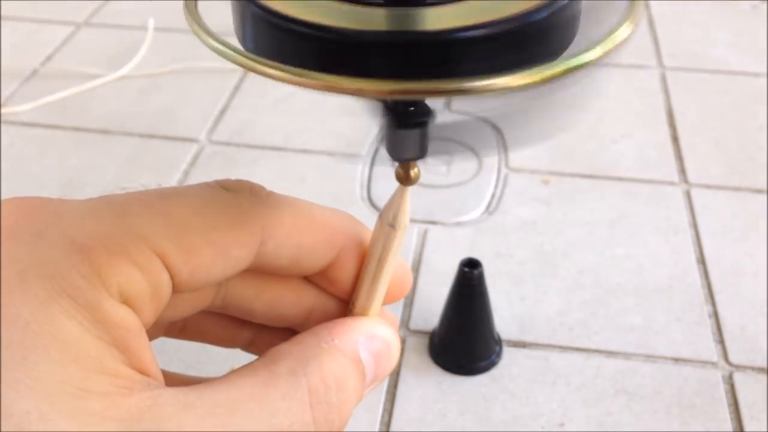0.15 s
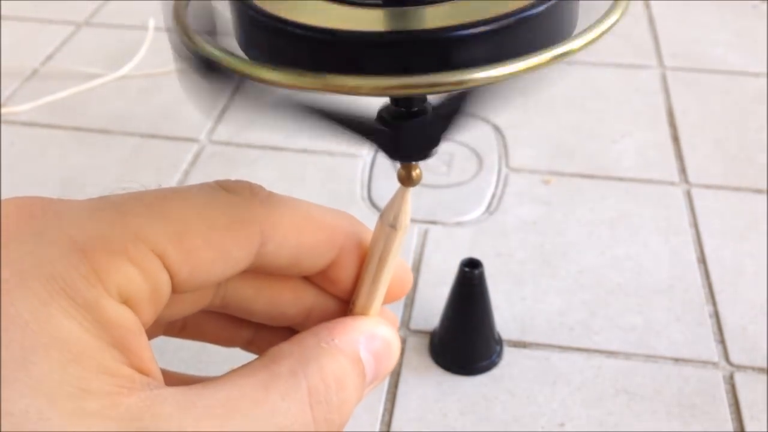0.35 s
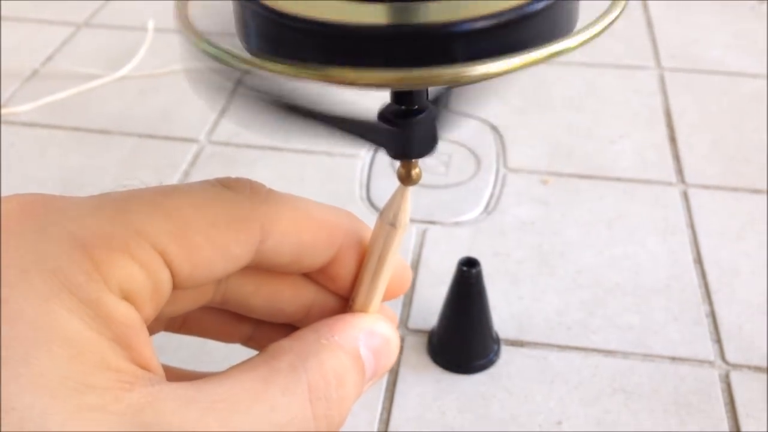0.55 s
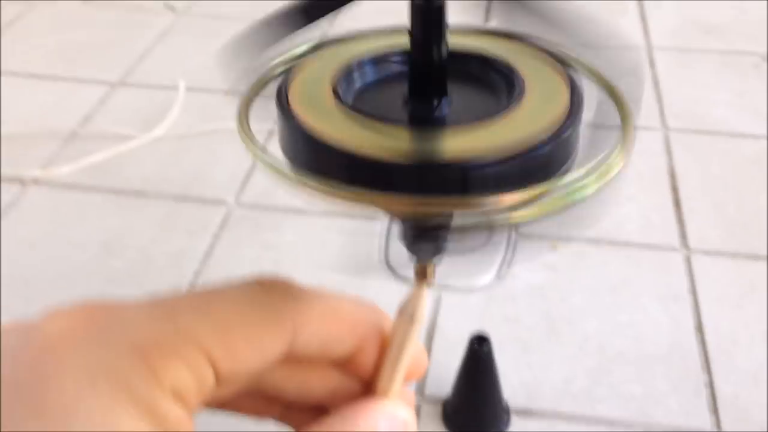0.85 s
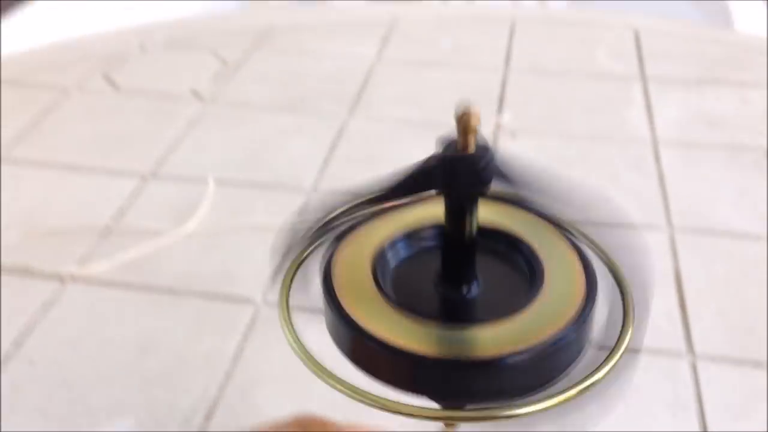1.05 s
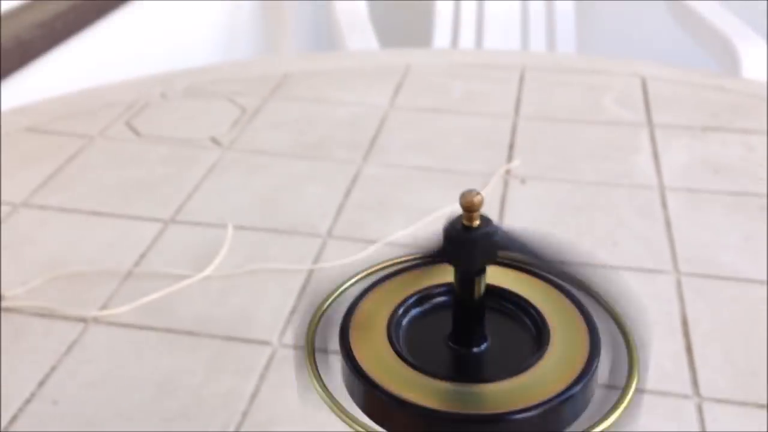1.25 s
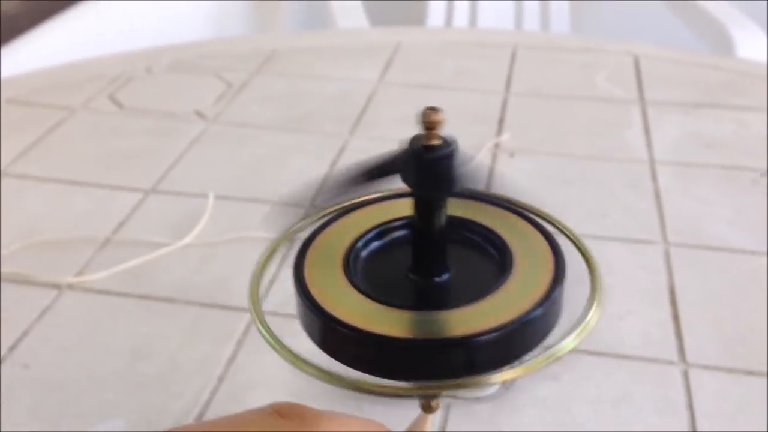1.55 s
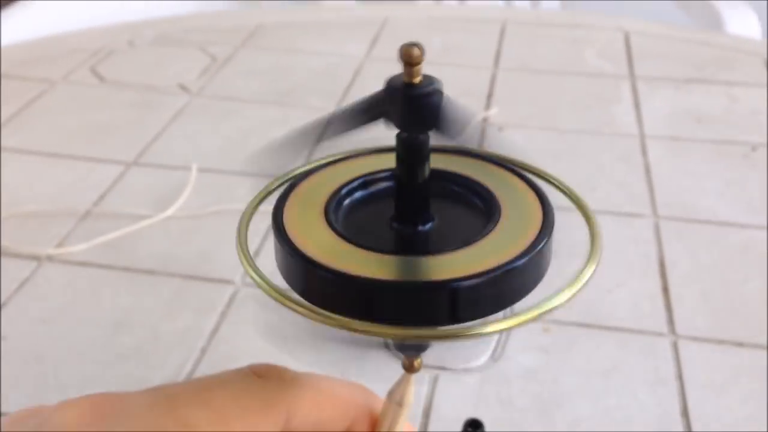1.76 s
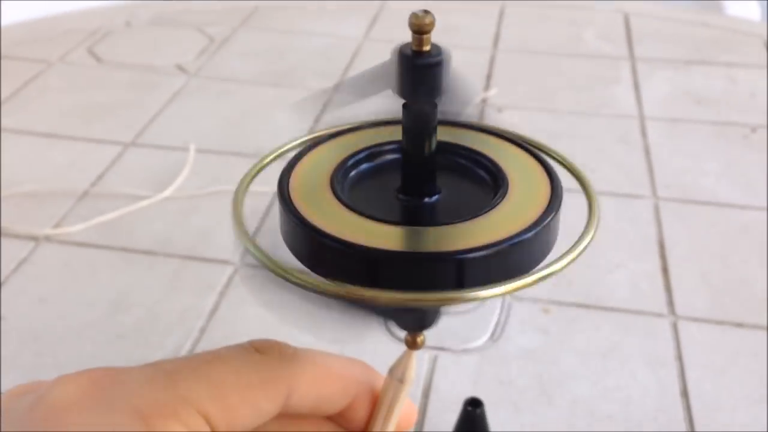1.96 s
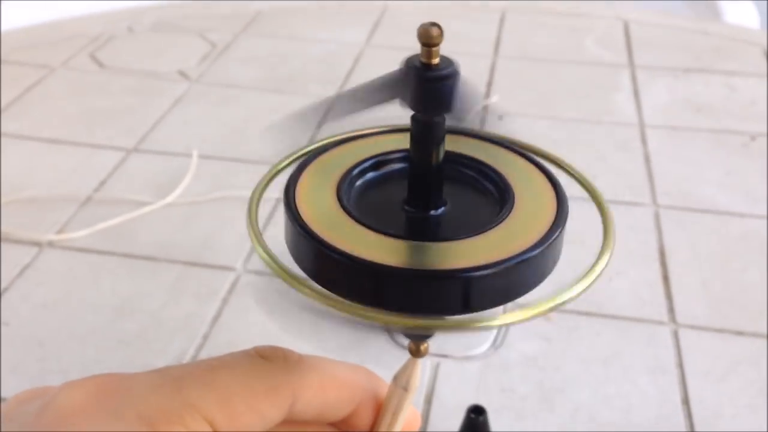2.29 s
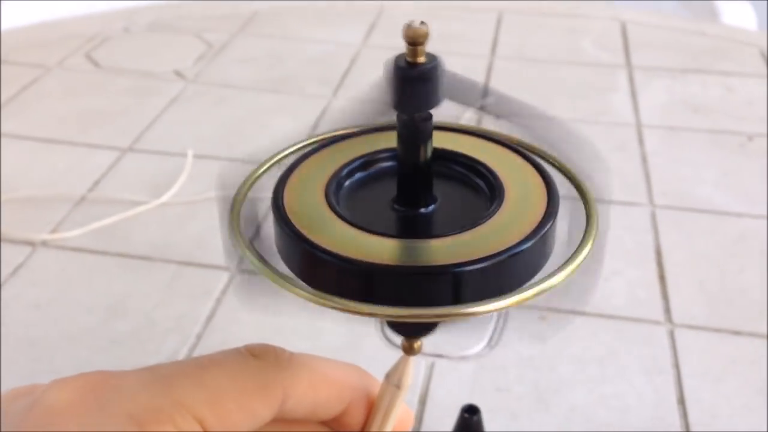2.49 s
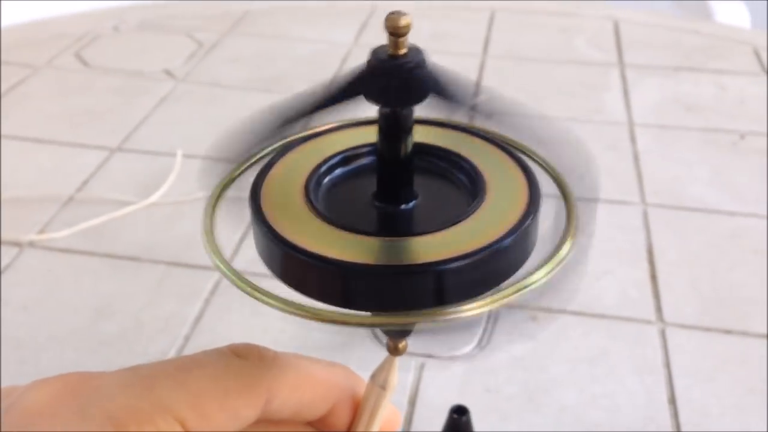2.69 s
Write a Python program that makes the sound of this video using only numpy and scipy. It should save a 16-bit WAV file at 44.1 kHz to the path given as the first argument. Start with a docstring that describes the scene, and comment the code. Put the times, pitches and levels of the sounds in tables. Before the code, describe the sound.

A toy gyroscope spins on a hand-held stick, its loose axle making a fast, whirring plastic rattle, close by indoors. The ticks come in quick, uneven flurries, loudest and brightest for the first 0.8 seconds, then a little softer and steadier until the end near 2.8 seconds. A faint low hum and buzz fade underneath, and one soft, dull knock comes at about 2.1 seconds over quiet room noise.

```python
"""A plastic rattle in quick flurries: a toy gyroscope spinning on the tip of a hand-held stick, indoors.
Its axle chatters in loose bearings about once a turn, flurrying as the frame swings round; every tick
rings the plastic body. The slowing wheel hums, stick and hand buzz, something knocks once.
Underneath: a low drone, a faint brief whine, rumble and the room's murmur."""
import sys
import numpy as np
from scipy import signal
from scipy.fft import rfft, irfft, next_fast_len
from scipy.io import wavfile
from scipy.ndimage import uniform_filter1d, map_coordinates

SR = 44100
rng = np.random.default_rng(int(sys.argv[2]) if len(sys.argv) > 2 else 0)


def store_wav(level_fs):
    """Save 16-bit WAV to argv[1]."""
    pcm = np.round(np.clip(np.atleast_2d(level_fs), -1, 1) * 32767)
    wavfile.write(sys.argv[1], SR, pcm.T.astype(np.int16))


N = 124803

# Swells of axle chatter: centre_s, level_db, width_s
FLURRIES = [(0.009, -40, 0.021), (0.099, -41, 0.015), (0.132, -41, 0.017), (0.176, -38.5, 0.024),
            (0.228, -40.5, 0.055), (0.293, -37.5, 0.016), (0.344, -40, 0.042), (0.403, -35.5, 0.016),
            (0.46, -40.5, 0.036), (0.518, -43, 0.017), (0.568, -42.5, 0.033), (0.634, -44.5, 0.028),
            (0.663, -54, 0.0065), (0.693, -43.5, 0.02), (0.765, -41, 0.02), (0.825, -48, 0.056),
            (0.904, -42, 0.012), (0.97, -40.5, 0.016), (1.045, -42.5, 0.036), (1.117, -46.5, 0.033),
            (1.191, -47, 0.04), (1.237, -55, 0.0068), (1.258, -44, 0.038), (1.3, -47, 0.014),
            (1.351, -46, 0.037), (1.434, -42.5, 0.019), (1.506, -43.5, 0.013), (1.58, -47.5, 0.012),
            (1.6, -49.5, 0.035), (1.68, -46, 0.03), (1.781, -45.5, 0.041), (1.809, -58, 0.0061),
            (1.86, -47, 0.045), (1.952, -48, 0.062), (1.99, -49.5, 0.014), (2.039, -44.5, 0.027),
            (2.065, -46.5, 0.016), (2.15, -44.5, 0.036), (2.243, -46, 0.045), (2.319, -44.5, 0.022),
            (2.346, -44.5, 0.012), (2.427, -49.5, 0.044), (2.459, -50, 0.014), (2.527, -47, 0.036),
            (2.644, -48, 0.047), (2.704, -63, 0.014), (2.747, -50.5, 0.068), (2.823, -43, 0.0082)]
# Chatter between flurries: time_s, level_db
CHATTER_FLOOR = [(0.0, -38), (0.24, -55), (0.54, -52), (0.94, -49.5), (1.43, -51), (1.81, -54), (2.13, -53),
                 (2.48, -53), (2.83, -52)]
# Loudest axle ticks: time_s, relative_level_db, relative_brightness_db
LOUD_TICKS = [(0.0022, -34.5, 14), (0.0075, -23, -10), (0.015, -39, 18), (0.0174, -39, 11),
              (0.0272, -37, 6), (0.038, -28, 7), (0.0495, -28, -2), (0.1637, -46, -24), (0.1697, -25, -23),
              (0.172, -35, 2), (0.1757, -25.5, -20), (0.179, -27.5, 5), (0.1856, -23, -4), (0.2, -27.5, 5),
              (0.2106, -25, -18), (0.216, -33, 2), (0.222, -35, 3), (0.23, -23.5, 1.5),
              (0.2825, -25.5, -12), (0.2916, -34, -12), (0.2992, -27, -2), (0.3295, -25, -15),
              (0.335, -32, 0), (0.3398, -29, -1), (0.3487, -27, 1), (0.3535, -20, -17),
              (0.3979, -22.5, -10), (0.4034, -35, -1), (0.407, -30, -7), (0.4109, -25, 2),
              (0.448, -42, -27), (0.4497, -34.5, 10), (0.456, -20.5, -4), (0.4625, -28, 9),
              (0.5044, -32, -18), (0.5178, -25, 1.5), (0.565, -30, -15), (0.5669, -24, -19),
              (0.5728, -40, -8), (0.5794, -34, 4), (0.5986, -31, -3), (0.6714, -30.5, -13), (0.689, -35, 2),
              (0.6996, -37, 10), (0.7142, -25.5, -6), (0.7193, -24, -23), (0.755, -31, -25),
              (0.7623, -28, 8), (0.769, -39, 13), (0.7732, -35, -1), (0.8995, -48, -26), (0.9072, -36, -4),
              (0.967, -38, -10), (0.9711, -46, -17), (0.9738, -32, -16), (0.9905, -26.5, -19),
              (1.0296, -28.5, -44), (1.0375, -30.5, -6), (1.0475, -34, -10), (1.0612, -41, -20),
              (1.115, -65, -33), (1.1853, -36, -39), (1.2113, -36, -41), (1.2273, -30.5, -34),
              (1.257, -46, -20), (1.2628, -24, -16), (1.2935, -30, -28), (1.332, -36, -26),
              (1.3495, -28.5, -12), (1.3619, -33, 1), (1.373, -46, -15), (1.413, -33, -33),
              (1.438, -30, -11), (1.454, -32.5, -18), (1.4635, -28, -16), (1.4702, -35, -13),
              (1.495, -28, -15), (1.5048, -31, -11), (1.5154, -26.5, -13), (1.518, -30, -28),
              (1.5297, -28, -27), (1.5368, -30, -30), (1.5768, -28.5, -34), (1.618, -27, -16),
              (1.625, -28, -21), (1.6696, -34, -13), (1.6796, -32.5, -38), (1.696, -30, -27),
              (1.7042, -30, -22), (1.746, -33, -22), (1.7608, -29, -9), (1.7624, -44, -19),
              (1.7876, -29.5, -22), (1.8105, -37, -26), (1.8455, -29, -28), (1.8545, -29, -10),
              (1.861, -29, -14), (1.8663, -29.5, -12), (1.874, -35, -25), (1.9527, -31.5, -14),
              (2.0366, -28.5, -14), (2.0655, -31, -9), (2.1223, -28, -24), (2.1255, -28, -18),
              (2.1318, -28, -10), (2.1355, -38, 12), (2.1385, -33.5, 5), (2.1435, -47, -6),
              (2.1474, -38.5, 5), (2.1593, -38, -12), (2.1656, -37, -13), (2.2238, -34.5, -1),
              (2.2333, -34, 7), (2.2571, -29, -4), (2.3048, -28.5, -27), (2.3119, -28, -17),
              (2.321, -35, -22), (2.326, -42, -6), (2.3558, -29.5, -10), (2.41, -33, -12),
              (2.4144, -26.5, -21), (2.4217, -34, 2), (2.429, -34, -17), (2.4593, -29.5, -36),
              (2.5152, -33, -13), (2.521, -44, -12), (2.527, -39.5, -6), (2.5379, -34.5, -2),
              (2.5439, -30.5, -34), (2.5513, -31.5, -33), (2.617, -33.5, -6), (2.6306, -35, -6),
              (2.6342, -33, -17), (2.6418, -31.5, -4), (2.6928, -28, -12), (2.7117, -32, -15),
              (2.7179, -32, -12), (2.7224, -33, -11), (2.7357, -33, -4), (2.758, -30, -10),
              (2.8098, -34, 2), (2.8173, -33, -12), (2.8222, -28, -26), (2.8257, -50, -30)]
# Listener's rise over the wheel: time_s, share_0_to_1
LISTENER_RISE = [(0, 0), (.5, 0.17), (.8, 0.16), (1.2, 0.86), (2.83, 1)]
# Plastic body modes: pitch_hz, width_hz, gain_from_below_db, gain_from_above_db
BODY_MODES = [(537, 93, -19, -23), (932, 180, -30.5, -30.5), (1190, 76, -23.5, -26), (1545, 82, -19, -24),
              (1836, 250, -24, -27.5), (2056, 195, -14, -17.5), (2372, 160, -11, -16), (2858, 440, -7, -20),
              (3810, 530, -11, -10), (4506, 440, -6, -25.5), (5047, 340, -7.5, -2), (5464, 290, 0, -1.5),
              (5784, 580, -4.5, -11.5), (6680, 2600, -16, -15.5), (7956, 580, -10.5, -17.5),
              (9270, 1350, -21, -25), (10700, 300, -24, -30), (11430, 500, -22, -20.5),
              (12980, 790, -36, -44), (15300, 1300, -62, -33), (13800, 2200, -28, -30.5)]
# Hum of the wheel's unbalance: time_s, level_db
HUM_LEVEL = [(0, -60.5), (.4, -65.5), (.8, -72), (1.1, -65), (1.4, -75), (1.75, -77), (2.83, -84)]
# Buzz of stick and hand: time_s, level_db
BUZZ_LEVEL = [(0, -63.5), (.35, -64), (.6, -66.5), (1, -74.5), (1.4, -98), (2.83, -77)]
# Modes of the knocked object: pitch_hz, relative_level_db, undamped_t60_s
KNOCK_MODES = [(220, -4.5, 0.045), (580, -26, 0.062), (965, -4, 0.073), (1121, -9.5, 0.07),
               (1294, -6.5, 0.078), (1475, -11.5, .07), (1940, -12, 0.07)]
# Low wavering tone: time_s, level_db
DRONE_LEVEL = [(0, -81), (.5, -70), (.9, -82.5), (1.5, -72), (1.9, -86), (2.1, -66.5), (2.4, -74.5),
               (2.6, -66.5), (2.83, -67)]
# Faint brief tone: time_s, level_db
WHINE_LEVEL = [(.4, -90), (.55, -69), (.7, -76.5), (.9, -83)]
# Low rumble: time_s, level_db
RUMBLE_LEVEL = [(0.0, -83), (0.04, -54.5), (0.07, -76), (0.73, -67), (0.8, -84), (1.5, -71.5), (1.57, -84),
                (2.08, -68.5), (2.17, -83), (2.42, -63), (2.45, -99), (2.58, -66), (2.7, -83), (2.83, -65)]
# Room noise spectrum: frequency_hz, relative_density_db
MURMUR_SPECTRUM = [(53, -50), (90, -14), (140, 3), (356, -7.5), (512, -13), (708, -11.5), (828, -12),
                   (1390, -20), (2000, -33), (2600, -4), (4400, -120)]

SPIN_HZ, SPIN_SAG_HZ_PER_S = 208.5, 29
CHATTER_HZ, CHATTER_SAG_HZ_PER_S, CYCLE_LOCK = 174.15, 20, 0.57
LOUD_TICK_GAIN, SMALL_TICK_GAIN, RUB_GAIN = 15.93, 28.39, 1.897
CONTACT_S, TRAVEL_S, SCRAPE_S, WHIRR_S = 0.00039, 0.0004, 0.002, 0.02
LOW_BELOW_HZ, HIGH_ABOVE_HZ, BAND_SPAN_HZ = 4100, 6000, 1600  # mode groups
LOW_TICK_DB, HIGH_TICK_DB, WHIRR_DB, SIZZLE_DB = -3.5, -3.5, 8, 2.5
SIZE_SCATTER_DB, MODE_SCATTER_DB, BRIGHT_SHARE = 2, 1.5, 0.6
KNOCK_START_S, KNOCK_GAIN_DB, KNOCK_RISE_S = 2.0602, -31.5, 0.007
KNOCK_FREE_S, KNOCK_DAMPING_T60_S, KNOCK_ROUGH_DB = 0.02, 0.035, 3.5
RATTLE_ROOM_DB, KNOCK_ROOM_DB, MURMUR_DB = -10.5, -8.5, -66.5
TIME_S = np.arange(N) / SR


def rattle():
    """Ticks and rub ring the plastic body, heard first from below, then from above."""
    hz, width_hz, below_db, above_db = np.transpose(BODY_MODES)[:, :, None]
    contact_s = CONTACT_S * np.minimum(1, HIGH_ABOVE_HZ / hz) ** 2

    def body_response(f):
        soft_contact = 0.012 + np.exp(-(np.pi * contact_s * (f - hz)) ** 2)
        return resonance(f, hz, width_hz) * soft_contact

    view_db = below_db + (above_db - below_db) * np.clip(curve(LISTENER_RISE), 0, 1)
    turning_db = np.array([wobble(25) for _ in BODY_MODES])  # modes waver as the frame turns
    low, high = hz < LOW_BELOW_HZ, hz > HIGH_ABOVE_HZ
    level = chatter_level()
    blows = mode_blows(hz[:, 0], *axle_ticks(level))
    drive = blows * amp(LOW_TICK_DB * low + HIGH_TICK_DB * high) + bearing_rub(level, low, high)
    return np.sum(amp(view_db + turning_db) * filtered(drive, body_response), axis=0)


def chatter_level():
    """How hard the axle chatters: a floor plus a swell at each flurry."""
    swell_power = sum(amp(2 * db) * np.exp(-4 * np.log(2) * ((TIME_S - centre_s) / width_s) ** 2)
                      for centre_s, db, width_s in FLURRIES)
    return np.sqrt(swell_power + amp(2 * curve(CHATTER_FLOOR)))


def axle_ticks(level, small_count=1900):
    """The axle hits its bearings: small ticks, strongest once a contact cycle, plus the loud ones."""
    cycle = turns(CHATTER_HZ, CHATTER_SAG_HZ_PER_S) + 0.17 * wobble(30)
    bunching = 1 + CYCLE_LOCK * np.cos(2 * np.pi * cycle)
    small_at = rng.integers(0, N, size=small_count)
    small = amp(SIZE_SCATTER_DB * rng.standard_normal(small_count)) * bunching[small_at] ** 2
    loud_s, loud_db, bright_db = np.transpose(LOUD_TICKS)
    sizes = np.r_[SMALL_TICK_GAIN * level[small_at] * unit(small), LOUD_TICK_GAIN * amp(loud_db)]
    treble_db = np.r_[np.zeros(small_count), BRIGHT_SHARE * (bright_db - bright_db.mean())]
    return np.r_[small_at, loud_s * SR], sizes, treble_db


def mode_blows(mode_hz, tick_at, sizes, treble_db):
    """Modes close in pitch are struck together, keeping each tick firm; high modes get a short scrape."""
    uneven, lag, polarity = rng.standard_normal((3, len(sizes), len(mode_hz)))
    band = (mode_hz // BAND_SPAN_HZ).astype(int)
    high = mode_hz > HIGH_ABOVE_HZ
    signs = np.sign(polarity[:, band]) * (-1) ** np.arange(len(mode_hz))
    gains = signs * sizes[:, None] * amp(MODE_SCATTER_DB * uneven + treble_db[:, None] * high)
    arrivals = np.clip(tick_at[:, None] + TRAVEL_S * SR * (lag[:, band] - 1), 0, N - 1).astype(int)
    blows = np.array([np.bincount(at, gain, N) for at, gain in zip(arrivals.T, gains.T)])
    scrape_power = np.abs(uniform_filter1d(blows[high] ** 2, round(SCRAPE_S * SR), axis=1))
    blows[high] = np.sqrt(scrape_power) * rng.standard_normal(scrape_power.shape)
    return blows


def bearing_rub(level, low, high):
    """Rubbing noise: an even whirr in the low modes, a sizzle in the high ones."""
    whirr = amp(WHIRR_DB) * uniform_filter1d(level, round(WHIRR_S * SR))
    envelope = np.where(low, whirr, amp(SIZZLE_DB * high) * level)
    return RUB_GAIN * envelope * rng.standard_normal(envelope.shape)


def knock():
    """One soft, dull knock: a rough ring, soon damped, trailing off in the room."""
    age_s = np.maximum(TIME_S - KNOCK_START_S, 0)
    rise = 1 - np.exp(-age_s / KNOCK_RISE_S)
    ring = np.zeros(N)
    for hz, db, t60_s in KNOCK_MODES:
        decay = amp(db - 60 * age_s / t60_s + KNOCK_ROUGH_DB * wobble(90))
        ring += decay * np.sin(2 * np.pi * hz * age_s) * rise ** (hz / 450)  # higher modes rise later
    damping_db = -60 * np.maximum(age_s - KNOCK_FREE_S, 0) / KNOCK_DAMPING_T60_S
    bump = amp(KNOCK_GAIN_DB + damping_db) * ring
    return bump + amp(KNOCK_ROOM_DB) * reflections(bump, t60_s=0.97, crossfade_hz=90)


def wheel_hum():
    """The unbalanced wheel hums at its falling spin rate."""
    return tone(turns(SPIN_HZ, SPIN_SAG_HZ_PER_S), HUM_LEVEL, waver_db=2, waver_cycles=0.13)


def stick_buzz():
    """Low buzz of stick and hand."""
    return noise_band(BUZZ_LEVEL, hz=296.2, width_hz=83, waver_db=1)


def faint_tones():
    """A low wavering drone and a brief whine."""
    drone = tone(turns(hz=130.5), DRONE_LEVEL, waver_db=-4, waver_cycles=0.19)
    whine = tone(turns(hz=559), WHINE_LEVEL, waver_db=0, waver_cycles=0.19)
    return drone + whine


def rumble():
    """Low noise in brief swells."""
    return noise_band(RUMBLE_LEVEL, hz=74.6, width_hz=83, waver_db=1.5)


def room_murmur(patch_db=2.75):
    """The room's low noise, unsteady in patches of time and frequency."""
    hz, db = np.transpose(MURMUR_SPECTRUM)
    spectra = signal.stft(rng.standard_normal(N + 512), nperseg=512)[2]
    patches = uniform_filter1d(rng.standard_normal(spectra.shape), size=8, axis=0)
    patches = uniform_filter1d(patches, size=10, axis=1)
    noise = signal.istft(spectra * amp(patch_db * unit(patches)), nperseg=512)[1][:N]
    shaped = filtered(noise, lambda f: amp(np.interp(np.log(f + 1), np.log(hz + 1), db, right=-120)))
    return amp(MURMUR_DB) * unit(shaped)


def reflections(x, t60_s, crossfade_hz):
    """Diffuse room reflections: six noise tails, crossfaded to avoid comb colouring."""
    weights = np.array([wobble(crossfade_hz) for _ in range(6)])
    decay = amp(-60 * np.arange(SR // 2) / SR / t60_s)
    wet = np.zeros(N)
    for weight in weights / np.linalg.norm(weights, axis=0):
        tail = decay * rng.standard_normal(len(decay))
        wet += signal.fftconvolve(x * weight, tail / np.linalg.norm(tail))[:N]
    return wet


def tone(cycles, level_rows, waver_db, waver_cycles):
    """A sine, unsteady in level and phase."""
    envelope = np.sqrt(2) * amp(curve(level_rows) + waver_db * wobble(25.55))
    return envelope * np.sin(2 * np.pi * (cycles + waver_cycles * wobble(20)))


def noise_band(level_rows, hz, width_hz, waver_db):
    """Unsteady noise, passed twice through one resonance."""
    noise = filtered(rng.standard_normal(N), lambda f: resonance(f, hz, width_hz) ** 2)
    return amp(curve(level_rows) + waver_db * wobble(9.8)) * unit(noise)


def turns(hz, sag_hz_per_s=0):
    """Cycles completed at an evenly falling rate."""
    return hz * TIME_S - sag_hz_per_s * TIME_S ** 2 / 2


def resonance(f, hz, width_hz):
    """Causal resonance, peak gain 1."""
    return 1j * f * width_hz / (hz * hz - f * f + 1j * f * width_hz)


def filtered(x, response):
    """x through a complex frequency response."""
    size = next_fast_len(N + SR // 2)
    return irfft(rfft(x, size) * response(np.fft.rfftfreq(size, 1 / SR)), size)[..., :N]


def wobble(rate_hz):
    """Smooth random curve, rate_hz knots a second."""
    knots = rng.standard_normal(int(N * rate_hz / SR) + 4)
    return map_coordinates(knots, [TIME_S * rate_hz])


def curve(rows):
    """(time_s, value) rows to one value per sample."""
    return np.interp(TIME_S, *np.transpose(rows))


def amp(db):
    """dB to gain."""
    return 10 ** (np.asarray(db) / 20)


def unit(x):
    """Scaled to rms 1."""
    return x / np.sqrt(np.mean(x ** 2) + 1e-20)


def scene():
    """All sources, mono, with short, diffuse room reflections of the rattle."""
    toy = rattle()
    room = amp(RATTLE_ROOM_DB) * reflections(toy, t60_s=0.036, crossfade_hz=14)
    mix = toy + room + knock() + wheel_hum() + faint_tones() + stick_buzz() + rumble()
    return (mix + room_murmur())[None]


def record(dry):
    """Treble fades from 15.2 kHz; nothing passes above 15.8 kHz."""
    edge_hz, edge_db = [15200, 15300, 15800], [0, -10, -26]
    return filtered(dry, lambda hz: (hz < edge_hz[-1]) * amp(np.interp(hz, edge_hz, edge_db)))


dry = scene()
out = record(dry)
store_wav(out)
```